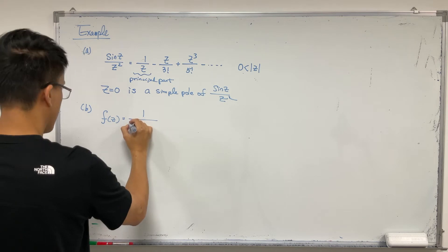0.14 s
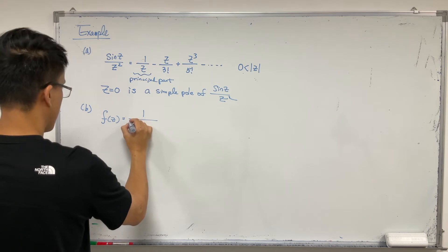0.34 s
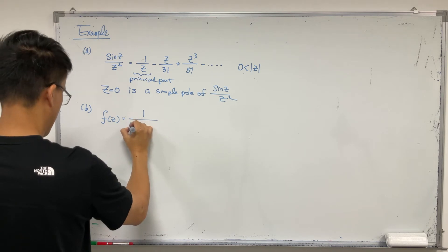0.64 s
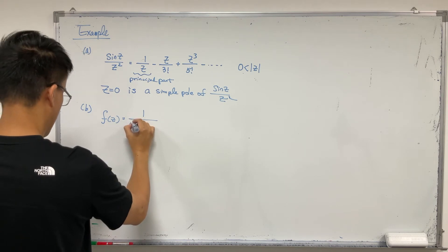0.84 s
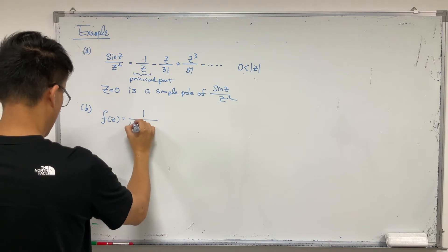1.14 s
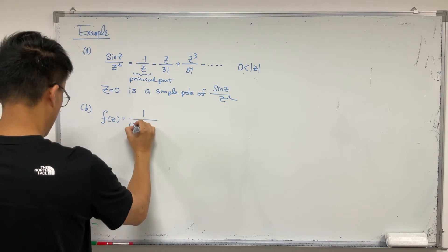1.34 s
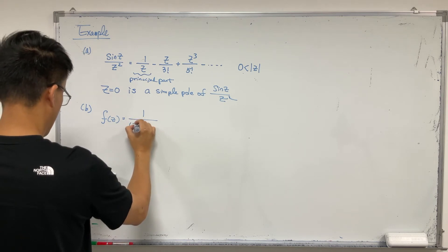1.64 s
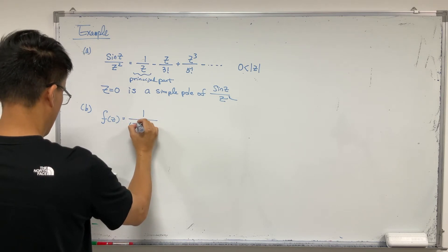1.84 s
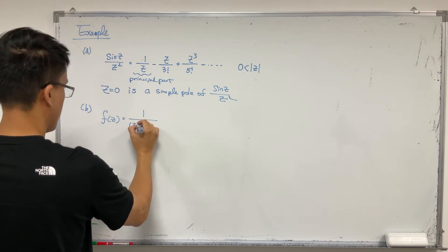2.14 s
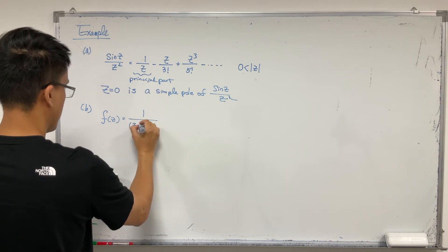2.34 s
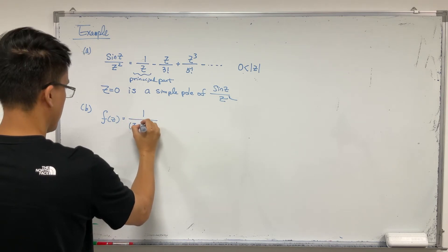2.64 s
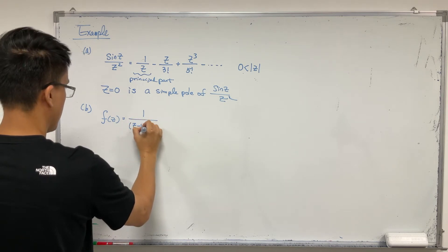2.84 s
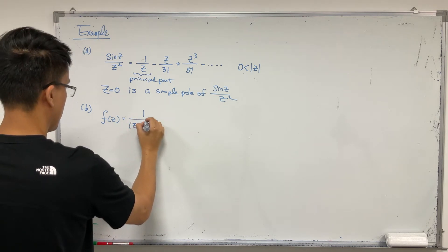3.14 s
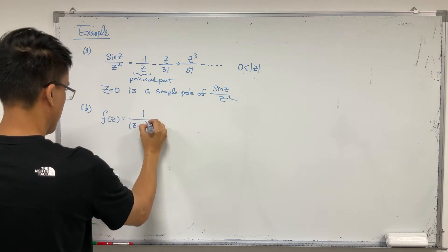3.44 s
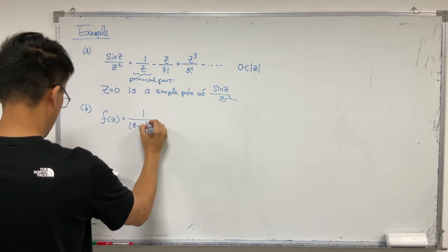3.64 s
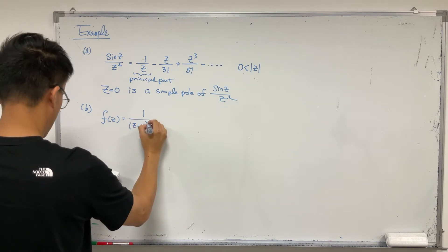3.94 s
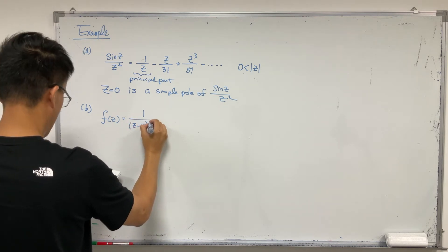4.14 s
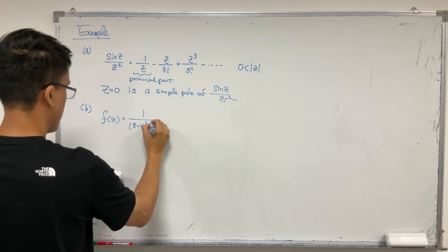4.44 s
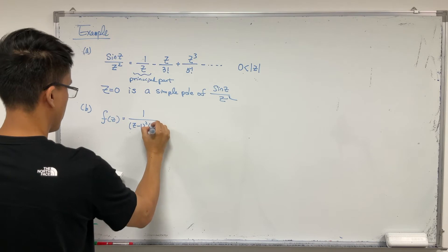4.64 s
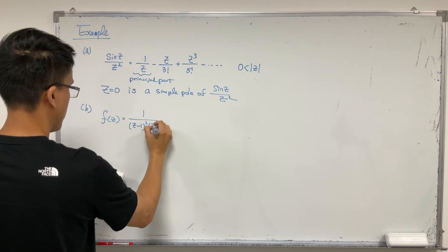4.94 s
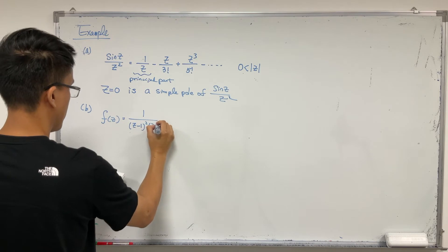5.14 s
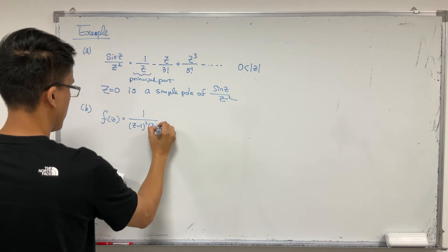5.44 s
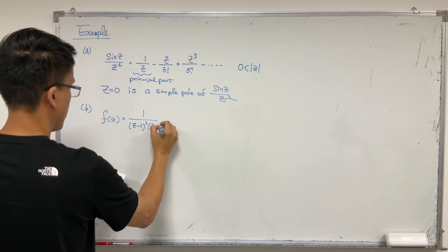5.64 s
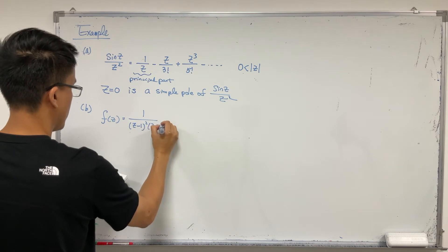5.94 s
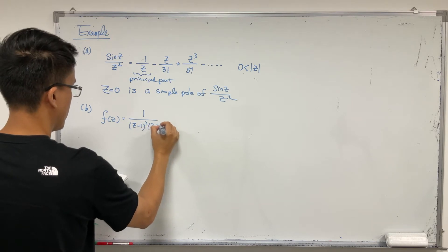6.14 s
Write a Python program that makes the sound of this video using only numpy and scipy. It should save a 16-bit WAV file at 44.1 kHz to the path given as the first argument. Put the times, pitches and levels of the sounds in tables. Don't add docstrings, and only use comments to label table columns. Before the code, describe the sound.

Marker writing on a hard board: brief thin squeaks, mostly rising in pitch, some dipping, with tiny dry ticks as the tip lands or catches. They come in groups separated by near silence, where only soft air conditioning with a slowly pulsing low hum remains. One hollow creak sounds after four seconds, followed by the densest squeaking. Fairly close microphone, small lightly ringing room; the background swells slightly during squeaks.

```python
import sys
import numpy as np
from scipy import signal
from scipy.fft import rfft, irfft
from scipy.io import wavfile
from scipy.ndimage import uniform_filter1d

SR = 44100
rng = np.random.default_rng(int(sys.argv[2]) if len(sys.argv) > 2 else 0)


def gain_from_db(level_db):
    decades = np.asarray(level_db, float) / 20
    return 10 ** decades


def master_out(mix):
    frames = np.transpose(np.atleast_2d(mix))
    ceiling = np.clip(frames, -1, 1)
    pcm = np.round(ceiling * 32767).astype(np.int16)
    wavfile.write(sys.argv[1], SR, pcm)


N = 277830


def read(points, hz):
    f, value = np.transpose(points)
    return np.interp(np.log(hz + 1), np.log(f + 1), value)


def evened(x):
    return x / np.sqrt(np.mean(x ** 2) + 1e-20)


def add(mix, s, sound):
    part = mix[round(s * SR):][:len(sound)]
    part += sound[:len(part)]


def resonate(x, hz, width_hz):
    r = np.exp(-np.pi * width_hz / SR)
    return 2 * signal.lfilter([1 - r], [1, -r * np.exp(2j * np.pi * hz / SR)], x).real


# (frequency [Hz], density [dB per Hz])
VENT_SPECTRUM = [(25, -20.5), (45, -16), (90, -17), (125, 2), (200, -5.5), (450, -6), (640, -10.5),
                 (760, -13), (2200, -24), (4100, -35.5), (5600, -36.5), (6600, -42), (8100, -44),
                 (11500, -55), (15000, -70)]


def vent(eased_db, patchy_db=0.52):
    frames, hz = N // 512 + 5, np.fft.rfftfreq(2048, 1 / SR)
    real, imag, patches = rng.standard_normal((frames, 1025, 3)).T
    patches = uniform_filter1d(patches, size=20, axis=0)
    patches = evened(uniform_filter1d(patches, size=8, axis=1))
    frame_eased_db = np.interp(np.arange(frames) * 512 / SR, np.arange(N) / SR, eased_db)
    patches += np.outer(.5 * np.clip(hz / 9000, 0, 1), frame_eased_db) / patchy_db
    z = (real + 1j * imag) * gain_from_db(read(VENT_SPECTRUM, hz)[:, None] + patchy_db * patches)
    return evened(signal.istft(z, nperseg=2048, noverlap=1536)[1][:N])


# (frequency [Hz], width [Hz], level [dB])
FAN_TONES = [(123.5, 13, -31), (150.9, 2.1, -15), (177.76, 5, -7), (229.3, 2.7, -9), (295.3, 18, -13.5),
             (353.7, 2.2, -9.5), (436.5, 12, -11.5)]


def fan():
    white = rng.standard_normal(N)
    return sum(gain_from_db(db) * evened(resonate(resonate(white, hz, width), hz, 3 * width))
               for hz, width, db in FAN_TONES)


MOTOR_HZ = 57.5
HUM_DB, HUM_LEFT = -6, 0.12
# (multiple of MOTOR_HZ, level [dB])
MOTOR_ORDERS = [(9, -14.5), (10, -9.5), (11, -12), (12, -28.5), (14, -33.5), (16, -16.5), (19, -24.5),
                (20, -23.5), (21, -18.5)]
MOTOR_CANCELS = [-.9, .05, 1.02, 1.95, 2.62, 3.62, 4.32, 5.39, 6.3, 7.2]


def motors():
    t = np.arange(N) / SR
    beat_turns = np.interp(t, MOTOR_CANCELS, np.arange(len(MOTOR_CANCELS)))
    beat = HUM_LEFT + abs(np.sin(np.pi * beat_turns)) ** 0.55
    hum = gain_from_db(HUM_DB) * beat * np.sin(2 * np.pi * MOTOR_HZ * t)
    whine = sum(gain_from_db(db) * np.sin(2 * np.pi * (k * MOTOR_HZ * t + rng.random())) for k, db in MOTOR_ORDERS)
    return whine + hum


CLOSED_DB, OPEN_DB = -63, 5


def air(open_db):
    return gain_from_db(open_db) * (vent(open_db - CLOSED_DB) + fan() + motors())


KNEE_DB, SPAN_DB = -47, 1.5
LAG_S, MEMORY_S, LATE_S, SETTLE_S = 0.055, 0.059, 0.014, 0.038


def opening(sound):
    power = sound ** 2
    for r in np.exp(-1 / (np.array([LAG_S, MEMORY_S]) * SR)):
        power = signal.lfilter([1 - r], [1, -r], power)
    power = np.interp(np.arange(N) - LATE_S * SR, np.arange(N), power)
    loudness_db = 10 * np.log10(power + 1e-9)
    share = 1 / (1 + np.exp(-4 * (loudness_db - KNEE_DB) / SPAN_DB))
    r = np.exp(-1 / (SETTLE_S * SR))
    return CLOSED_DB + OPEN_DB * signal.lfilter([1 - r], [1, -r], share)


def reducer(sound, noise, knee_db=6):
    z, floor = (signal.stft(x, nperseg=512, noverlap=384)[2] for x in (sound, noise))
    power = uniform_filter1d(abs(z) ** 2, size=5, axis=1)
    knee = gain_from_db(2 * knee_db) * np.mean(abs(floor) ** 2, axis=1, keepdims=True)
    return signal.istft(z * power / (power + knee), nperseg=512, noverlap=384)[1][:N]


WET_TILT_DB_PER_KHZ = -0.54
# (frequency [Hz], t60 [s])
ROOM_T60 = [(500, 0.75), (1500, 0.19), (2100, 0.33), (4000, 0.3), (10000, 0.2), (16000, 0.35)]
# (delay [s], level [dB])
EARLY_ECHOES = [
    (.004, -10.5),
    (.011, -11),
    (.0152, -28.5),
    (.019, -15.5),
    (.027, -30),
]


def room(x, wet_db=-3):
    taps = np.zeros(SR // 2)
    at = np.arange(520, SR // 2 - 20, 10)
    taps[at + rng.integers(0, 10, len(at))] = rng.choice([-1., 1.], len(at))
    hz, t, z = signal.stft(taps, SR, nperseg=256)
    decay = gain_from_db(-60 * t / read(ROOM_T60, hz)[:, None])
    tail = signal.istft(z * decay, SR, nperseg=256)[1]
    tail *= gain_from_db(wet_db) / np.linalg.norm(tail)
    khz = np.fft.rfftfreq(len(tail), 1000 / SR)
    tail = irfft(rfft(tail) * gain_from_db(WET_TILT_DB_PER_KHZ * khz), len(tail))
    for k, (s, db) in enumerate(EARLY_ECHOES):
        tail[round(s * SR)] += (-1) ** k * gain_from_db(db)
    tail[0] = 1
    return signal.fftconvolve(x, tail)[:N]


# (time [s], peak [dB])
CREAK_SLIPS = [
    (4.229, -49),
    (4.238, -47),
    (4.245, -41.5),
    (4.258, -37),
    (4.262, -57),
    (4.274, -41),
    (4.286, -61),
    (4.293, -40.5),
    (4.304, -55),
]
# (frequency [Hz], width [Hz], level [dB])
BODY_MODES = [(560, 53, 6), (500, 98, -2), (1024, 35, -11)]


def creak():
    slips = np.zeros(N)
    for s, db in CREAK_SLIPS:
        slips[round(s * SR)] = gain_from_db(db)
    tap = np.zeros(2000)
    tap[0] = 1
    ring = sum(gain_from_db(db) * evened(resonate(resonate(tap, hz, width), hz, 3 * width))
               for hz, width, db in BODY_MODES)
    return signal.oaconvolve(slips, ring / abs(ring).max())[:N]


# (time [s], peak [dB], brightest at [Hz], width [Hz])
TIP_TICKS = [(1.554, -61, 2730, 800), (2.414, -63.5, 4320, 1500), (2.469, -65, 7550, 2500),
             (2.735, -58, 7670, 3030), (3.088, -68, 7240, 2500), (3.216, -36, 7230, 4000),
             (3.241, -44.5, 6860, 4000), (3.391, -50.5, 4320, 990), (4.452, -61.5, 6940, 3050),
             (4.826, -61, 7000, 3000), (4.829, -36.5, 1950, 500), (3.239, -37, 1290, 704),
             (4.951, -45, 4570, 1100), (5, -61, 6800, 2500), (5.042, -54, 11700, 900),
             (5.056, -53, 11800, 466), (5.192, -53, 4740, 1000), (5.235, -56, 12000, 900),
             (5.342, -61, 7500, 3980)]


def ticks():
    out = np.zeros(N)
    t = np.arange(400) / SR
    for s, db, hz, width in TIP_TICKS:
        grit = rng.standard_normal(400) * np.exp(-t / 0.0014)
        burst = resonate(resonate(grit, hz, width), hz, width)
        add(out, s, gain_from_db(db) * burst / abs(burst).max())
    return out


EASE = .4


def glide(start_hz, to_hz, until, move, t):
    done = np.interp(t, [t[0] + .0005, *until], np.arange(len(until) + 1)) - move
    step_hz = np.diff([start_hz, *to_hz])[move]
    left = 1 - done - EASE * np.sign(step_hz) * done * (1 - done)
    return uniform_filter1d(to_hz[move] - step_hz * left, size=180, mode="nearest")


BLUR_DB = 0.06
SECOND_FOLLOW, SECOND_SHARE = 0.4, .18
BUILD_S, BUILD_DB = 0.0035, -8
EDGE_S, EDGE_DB = .008, -10
# (frequency [Hz], level [dB])
BOARD_RADIATION = [(1300, 0.5), (1540, 3), (1700, -11), (1850, 2.5), (1950, 0), (2050, -1.5), (2130, 0.8),
                   (2220, -6.5)]
# (frequency [Hz], level [dB])
BARREL_RADIATION = [(2600, -4), (3500, 3), (4200, -8.5), (4600, -23), (5300, 1), (6100, -8.5), (6700, -17),
                    (7700, -2.5), (8900, -17), (10300, -5), (12200, -14.5), (14000, -30), (15800, -31),
                    (19000, -55.5)]


def squeak(landing, moves, wobble, flutter_db=-0.1):
    start, start_hz, second_db, dull_db = landing
    until, to_hz, press_db, sharp_db = moves.T
    t = np.arange(start - .0005, until[-1] + 0.0048, 1 / SR)
    age = t - t[0]
    move = np.minimum(np.searchsorted(until, t), len(until) - 1)
    hz = glide(start_hz, to_hz, until, move, t)
    press_db = uniform_filter1d(press_db[move], size=260, mode="nearest")
    sharp_db = uniform_filter1d(sharp_db[move], size=260, mode="nearest")

    body_db = second_db + SECOND_FOLLOW * (press_db - press_db.mean()) + SECOND_SHARE * sharp_db
    glide_hz_per_ms = abs(np.gradient(hz)) * SR / 1000
    edge_db = press_db + sharp_db - BLUR_DB * glide_hz_per_ms
    edge_db += EDGE_DB * np.exp(-age / EDGE_S)

    slow = [evened(uniform_filter1d(w[:len(t)], size=120)) for w in wobble]
    phase = 2 * np.pi * np.cumsum(hz * (1 + 0.0016 * slow[0])) / SR
    first_db = press_db + read(BOARD_RADIATION, hz) + BUILD_DB * np.exp(-age / BUILD_S)
    tone = gain_from_db(first_db) * np.sin(phase)
    for k in range(2, 10):
        edge_share = np.clip(0.41 * (k - 2) ** 1.6, 0, 1)
        db = body_db + edge_share * (edge_db - body_db) - dull_db * max(k - 5, 0)
        db += read(BARREL_RADIATION, k * hz) + flutter_db * slow[k - 1]
        tone += gain_from_db(db) * np.sin(k * phase)
    ramp = np.clip(np.minimum(age / 0.003, (t[-1] - t) / 0.01), 0, 1)
    return t[0], np.sqrt(2) * np.sin(np.pi / 2 * ramp) ** 2 * tone


# (time [s], slip rate [Hz], second partial [dB],
# fall of partials above the fifth [dB per partial])
TIP_LANDINGS = [(.465, 1552, -51, 11), (0.961, 1790, -77, 5), (1.052, 2080, -78, 7), (1.103, 1406, -46, 17),
                (1.219, 1966, -46, 6), (1.587, 1970, -85, 5), (2.25, 2000, -75, 5), (2.483, 1800, -42, -3),
                (2.732, 2110, -63.5, -4.5), (2.763, 2066, -43.5, -3), (3.094, 1743, -47, 27.5),
                (3.164, 1933, -44.5, 0), (3.239, 1327, -37, 7), (4.146, 1326, -50.5, 8.5),
                (4.46, 1682, -46, 5), (4.531, 2021, -48.5, 4), (4.603, 1826, -42, 1.5),
                (4.826, 2114, -42.5, 5.1), (5.006, 1833, -43, -2.5), (5.196, 1914, -41, 17),
                (5.266, 2085, -45.5, 13), (5.321, 1955, -53, 22), (5.346, 1916, -42.5, 2.9),
                (5.418, 1955, -45, 13), (5.879, 1640, -42.5, 2.7)]
# (until [s], slip rate reached [Hz], pressure [dB], sharpness of slips [dB])
FASTER_MOVES = [(.52, 1985, -46, -1), (.528, 2080, -39.5, -55), (.972, 2215, -46, -77),
                (1.113, 1650, -30, -16), (1.131, 1830, -46.5, -12), (1.141, 1958, -29.5, -20.5),
                (1.157, 2050, -40, -35.5), (1.247, 1773, -68, -10), (1.262, 2085, -33, -47),
                (1.603, 2210, -60.5, -35), (2.264, 2300, -43.5, -79), (2.49, 1924, -33, -25.5),
                (2.503, 1974, -46.5, 5), (3.128, 2177, -39.5, -41), (3.248, 1975, -35.5, -42),
                (3.26, 2100, -32.5, -16), (4.153, 1700, -39.5, -16), (4.167, 1894, -40, -0.5),
                (4.183, 2126, -45, -45), (4.474, 2130, -41, -24.5), (4.64, 2091, -35.5, -15),
                (4.834, 2174, -46, -1.5), (5.031, 2150, -35, -29), (5.235, 2188, -38.5, -37),
                (5.299, 1978, -40.5, -14.5), (5.374, 2240, -37.5, -24), (5.448, 1792, -52, 0.5),
                (5.46, 1996, -30.5, -18.5), (5.89, 1813, -70, -30), (5.925, 2090, -37.5, -35)]
STEADY_MOVES = [(.478, 1560, -42, -14), (1.062, 1920, -67, -27), (2.531, 2019, -40, 1),
                (2.564, 1948, -33, -7.5), (2.741, 2130, -57.5, -6), (2.75, 2000, -41, -36),
                (2.775, 2094, -39.5, 1), (2.795, 2074, -49, 5.5), (2.814, 2008, -26.5, -12),
                (3.105, 1782, -39.5, -17), (3.169, 1972, -44, -3), (3.19, 1930, -37.5, -6.5),
                (3.21, 1820, -35, -11.5), (3.291, 2145, -38, -17), (4.486, 2225, -35, -35),
                (4.548, 1966, -42, 0), (4.56, 2026, -34, -36), (4.666, 2190, -32.5, -21),
                (4.846, 2124, -33, -22), (5.013, 1827, -38, -7), (5.021, 1773, -30, -22.5),
                (5.044, 2200, -35.5, -26), (5.209, 1954, -36, -25), (5.358, 1910, -34.5, -25.5),
                (5.466, 2110, -38, -41), (5.91, 1824, -34, -36.5), (5.953, 2157, -34.5, -13),
                (5.985, 2089, -36.5, -44)]
SLOWER_MOVES = [(1.234, 1633, -38, -26.5), (2.578, 1590, -44, -21), (3.227, 1220, -51.5, -4),
                (3.302, 1900, -31, -34), (4.612, 1828, -41.5, -6), (4.618, 1620, -40, -13),
                (5.274, 1797, -32, -49), (5.338, 1190, -56.5, -14), (5.438, 1706, -35, -20.5)]


def marker():
    out = ticks()
    moves = np.array(sorted(FASTER_MOVES + STEADY_MOVES + SLOWER_MOVES))
    stroke = np.searchsorted([landing[0] for landing in TIP_LANDINGS], moves[:, 0]) - 1
    for k, landing in enumerate(TIP_LANDINGS):
        add(out, *squeak(landing, moves[stroke == k], rng.standard_normal((9, 5500))))
    return out


def scene():
    squeaks = room(marker())
    noise = air(opening(squeaks))
    return (reducer(squeaks, noise) + creak() + noise)[None]


def band_limit(x):
    return signal.sosfilt(signal.butter(12, 15710, fs=SR, output="sos"), x)


def record(dry):
    return band_limit(dry)


dry = scene()
out = record(dry)
master_out(out)
```